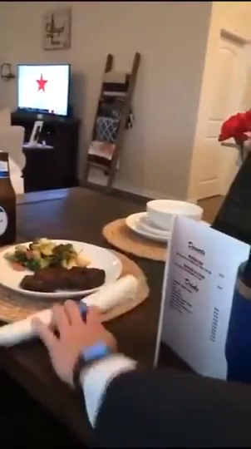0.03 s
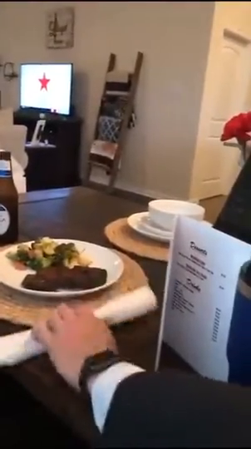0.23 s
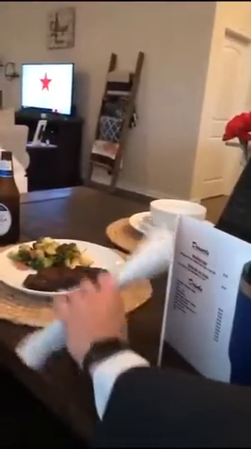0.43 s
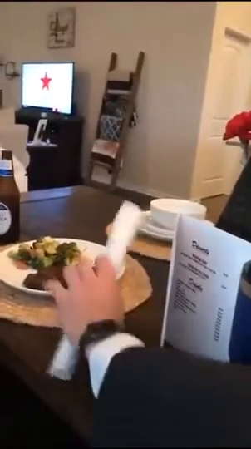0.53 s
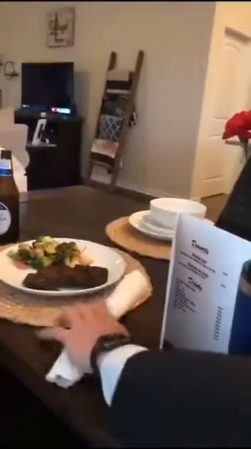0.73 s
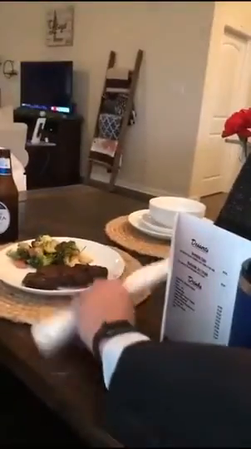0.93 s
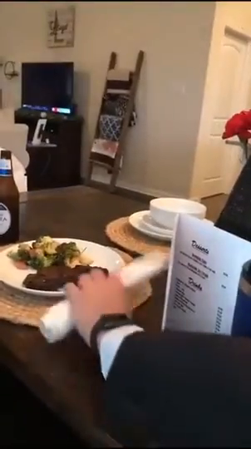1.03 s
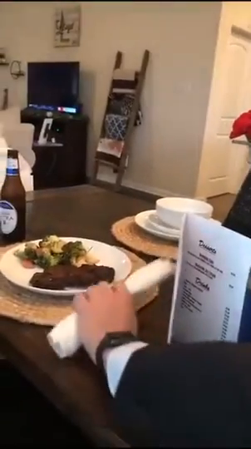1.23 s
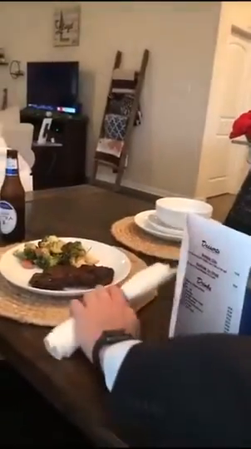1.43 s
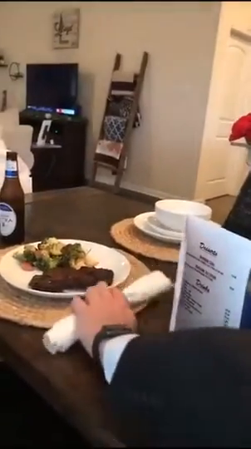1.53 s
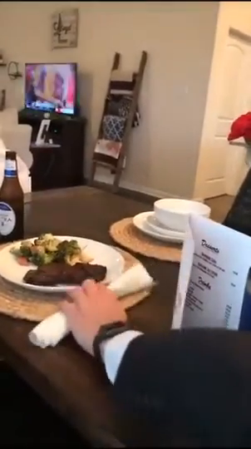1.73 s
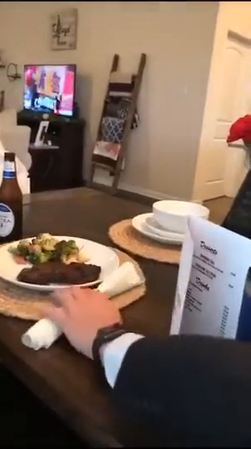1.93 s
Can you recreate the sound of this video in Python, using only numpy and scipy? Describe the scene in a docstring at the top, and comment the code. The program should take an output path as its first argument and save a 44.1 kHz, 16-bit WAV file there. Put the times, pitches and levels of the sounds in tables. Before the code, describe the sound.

Close up in a quiet dining room, a napkin roll of steel cutlery clinks in a quick cluster, knocks down on a wooden table, then ticks sparsely while cloth rubs softly over a woven mat.

```python
"""Cutlery rolled in a cloth napkin: knife and fork clink, ring until the cloth damps them, then tick in the hand.
Lifted and set down on a wooden dining table, heard close up; both channels are equal.
Steel, wood and crockery are sums of decaying sines; contacts are decaying random impulses, filtered.
The napkin rubs over the place mat as filtered grainy noise; a decaying-noise room answers over a quiet floor."""
import sys
import numpy as np
from scipy import signal
from scipy.fft import rfft, irfft
from scipy.io import wavfile
from scipy.ndimage import uniform_filter1d

SR = 44100
rng = np.random.default_rng(int(sys.argv[2]) if len(sys.argv) > 2 else 0)


def transcribe(signal):
    """Save signal, clipped to [-1, 1], as a 16-bit WAV file at the path in sys.argv[1]."""
    frames = np.atleast_2d(signal).T
    limited = np.clip(frames, -1, 1)
    pcm = np.round(limited * 32767).astype(np.int16)
    wavfile.write(sys.argv[1], SR, pcm)


N = 88200
T = np.arange(SR * 3 // 4) / SR  # time axis of one struck sound, s

# loose cutlery, metal on metal: start_s, click_db, tilt_db_per_octave, click_t60_s, ring_db, free_ring_s,
# handle_hz, handle_db
CLINK_EVENTS = [(.1952, -24, -4.5, 0.028, -49, 0.0018, 1800, -31),
                (.2078, -17.5, 1.5, 0.017, -12.5, 0.0029, 7300, -36),
                (0.2131, -18, -2.5, 0.019, -13.5, 0.0046, 3810, -33),
                (0.2279, -43, 7, .03, -12.5, 0.015, 3980, -37),
                (0.224, -23, -3, 0.025, -22, .004, 4670, -37),
                (0.2493, -15, 2.5, 0.015, -14.5, 0.014, 5650, -29),
                (0.254, -20, -2, 0.022, -16.5, 0.013, 3860, -31),
                (.258, -37, 6, 0.038, -32, .006, 2150, -35),
                (.371, -34.5, -3, 0.083, -48, 0.0072, 3086, -40.5),
                (0.382, -36, -2.5, 0.074, -28.5, 0.0068, 8400, -52),
                (.402, -37.5, 0.5, 0.12, -60.5, 0.0043, 8080, -42.5),
                (0.5249, -25.5, -1.5, 0.015, -37.5, .012, 5030, -48),
                (.535, -39.5, -7.5, 0.091, -38, 0.0054, 9500, -39),
                (0.5469, -31, -1.5, 0.075, -35, .014, 2980, -37.5),
                (0.5621, -29.5, -2, 0.094, -36, 0.0084, 2483, -35),
                (0.8308, -20.5, -4.5, 0.006, -48, 0.0016, 4340, -42),
                (0.8428, -35, -2, 0.096, -48, .008, 5500, -38),
                (0.8627, -28, -3, 0.023, -57, .003, 5700, -52),
                (0.8879, -8.5, -1.5, 0.0089, -23, 0.0018, 4570, -25),
                (0.8928, -11.5, 0.5, 0.0061, -48, .003, 2100, -32.5),
                (.9, -16.5, -0.5, 0.032, -23, 0.0036, 12200, -28),
                (.9035, -12, 12, 0.03, -32, 0.0058, 3690, -37),
                (.908, -26.5, -6.5, 0.02, -33, 0.011, 2073, -40)]
# cutlery pinched under the hand: start_s, click_db, tilt_db_per_octave, click_t60_s, ring_db, pinch_db,
# pitch1_hz, pitch2_hz, pitch3_hz
TICK_EVENTS = [(.099, -40, -1, 0.034, -67, -63, 2460, 4300, 5500),
               (1.073, -31, 3, 0.013, -46, -54, 4700, 7100, 13100),
               (1.1877, -13.5, -2, 0.0064, -31, -26.5, 3424, 5170, 12400),
               (1.195, -34, -2, 0.061, -34, -30, 4110, 5420, 13100),
               (1.238, -57, 6, 0.037, -43, -43, 3940, 5200, 10100),
               (1.3426, -16.5, 2.5, 0.018, -48, -28, 4180, 4560, 11240),
               (1.349, -29, -0.5, 0.033, -57, -30, 3900, 4400, 7400),
               (1.399, -41, -3, 0.036, -67, -46, 3970, 4480, 5320),
               (1.7511, -17.5, 5.5, 0.012, -39, -31.5, 4640, 5800, 13150),
               (1.758, -25, 6, 0.017, -53, -33, 4790, 5760, 13350),
               (1.87, -42, 5, .02, -53, -54, 4900, 7300, 13300),
               (1.95, -30.5, 1.5, 0.01, -44, -33.5, 4570, 7430, 13700),
               (1.953, -29, 4, 0.011, -49, -35, 5870, 7180, 13500)]
# two tines escape the grip and ring on, beating: start_s, level_db, t60_s, pitch1_hz, pitch2_hz
LINGERING_TINES = (1.1877, -42, .4, 12062, 12100)
# steel modes before damping: mode_hz, level_db, t60_s
STEEL_MODES = [(3900, -21, .2), (5440, -27, .2), (7303, -9.5, .45), (8000, -31, .17), (10150, -22, .3),
               (10253, -14, .4), (12026, -8, .25), (12062, 0, .3), (12099, -1, .3), (12240, -7, .13),
               (12380, -6, .1), (12630, -10, .19), (13040, -13, .25), (13652, -13, .5), (15420, -14, .4)]
# crack spectrum, loose steel: freq_hz, relative_db_per_hz
CLINK_SPECTRUM = [(100, -26), (900, -16), (1600, -10.5), (2300, -3), (3200, -3.5), (4400, 1), (6500, -0.5),
                  (8700, -2), (9800, -1), (10800, -4.5), (12300, 6.5), (14000, 3.5), (15600, -2.5)]
# crack spectrum, pinched steel: freq_hz, relative_db_per_hz
TICK_SPECTRUM = [(100, -32), (900, -28), (1700, -14), (2300, -1), (3300, 0), (4200, -1), (5400, 2),
                 (6300, -4), (7400, -4), (8600, -8), (10200, 0), (10900, -4), (11800, 6), (13200, 7),
                 (14200, -2), (15600, -2)]
# click reflections off plate, table and menu card: delay_s, level_db
CLICK_ECHOES = [(.0031, -6.5), (.0058, -27), (.0087, -10.5), (0.0153, -13.5)]
HANDLE_T60_S, PINCH_T60_S = 0.07, 0.04
CLOTH_DAMP_T60_S, HAND_DAMP_T60_S = 0.071, 0.16  # on top of each mode's own decay
STEEL_RISE_S = 0.0012
STRIKE_SPREAD_DB = 1  # +/- per mode, varies with the spot struck

# handles and hand on the table: start_s, knock_db, tilt_db_per_octave, boom_db
KNOCK_EVENTS = [(0.1957, -16.5, 3.5, -34), (0.2077, -27, -2, -50), (.217, -32, -2, -32),
                (0.245, -46, -8, -45), (0.284, -35, -5.5, -50), (.3525, -22.5, 3.5, -45.5),
                (0.3632, -32.5, 2, -42), (0.371, -42, 2, -40), (.57, -46, 1, -43.5),
                (0.8307, -15, 0.5, -36), (0.8417, -27, -2, -36), (.850, -24, -3.5, -37.5),
                (.888, -25.5, 3, -26.5), (.903, -28, -5.5, -28), (0.934, -39, -1, -34),
                (0.953, -46, -10, -36), (1.003, -41, -3.5, -44.5), (1.612, -65, -3, -51)]
# wood modes: mode_hz, level_db, t60_s
WOOD_MODES = [(236.6, -9, .18), (382, -8, .11), (440, -.5, .038), (502, -3.5, .045), (610, -7, .09),
              (848, -11, .075), (922, -4.5, .045), (952, -1.5, .04), (1235, -11, .055), (1900, -10, .016)]
# modes of the whole table top: mode_hz, level_db, t60_s
BOOM_MODES = [(61.3, -19, 0.25), (77.4, -4.5, 0.3), (105.2, -3, 0.39), (174.8, 2, 0.27), (249, 0, 0.33),
              (348, -12.5, 0.27)]
# knock rattle spectrum: freq_hz, relative_db_per_hz
RATTLE_SPECTRUM = [(40, -29), (120, -7), (230, -1.5), (340, -4), (480, 5), (720, -3), (960, -19.5),
                   (1100, -6.5), (1400, -17), (1900, -18), (2600, -24), (4000, -40.5), (9000, -47),
                   (16000, -75)]
# spectrum of the dull push into the table: freq_hz, relative_db_per_hz
THUMP_SPECTRUM = [(25, -33.5), (60, -2.5), (110, 1.5), (170, 0.5), (260, 4), (380, -6.5), (700, -27.5),
                  (2000, -68), (16000, -80)]
RATTLE_T60_S, RATTLE_RISE_S, RATTLE_DB = 0.07, 0.002, -4
THUMP_T60_S, BOOM_RISE_S, BOOM_DB = 0.13, 0.0029, -1
WOOD_RISE_CYCLES = 1.2

# light touch on crockery: start_s, level_db
CROCKERY_TOUCH = (1.8438, -37.5)
# crockery modes: mode_hz, level_db, t60_s
CROCKERY_MODES = [(2277, 0, .1), (3187, -3, .12), (4204, -13, .1)]

# cloth and cutlery sliding: start_s, length_s, level_db, tilt_db_per_octave
RUB_EVENTS = [(0.464, 0.079, -48.5, 1), (.55, .14, -51.5, 0), (0.676, 0.13, -56, -2),
              (0.775, 0.074, -44, 0), (0.913, 0.098, -48.5, -6), (1.062, 0.054, -47, -1.5),
              (1.222, 0.044, -47.5, 5), (1.357, 0.033, -49.5, 0), (1.578, 0.031, -56, -1),
              (1.731, 0.23, -48.5, -6), (1.924, 0.092, -48.5, -3.5)]
# cloth friction spectrum: freq_hz, relative_db_per_hz
CLOTH_SPECTRUM = [(100, -3.5), (600, -20), (1300, 1), (2200, 4), (3500, 0), (5500, 2.5), (9000, -5),
                  (12500, 2.5), (16000, -30)]

# room decay: freq_hz, t60_s
ROOM_DECAY = [(60, 0.15), (250, 0.62), (1000, 0.5), (4000, 0.68), (8000, 0.62), (15000, 0.32)]
WET_WOOD_DB, WET_STEEL_DB = -5, -16.5  # sends to the room
ROOM_RAMP_S = 0.009

# background spectrum: freq_hz, relative_db_per_hz
FLOOR_SPECTRUM = [(12, -22), (20, -0.5), (53, 2), (107, -11.5), (187, -11.5), (337, -14.5), (590, -18.5),
                  (780, -25.5), (1060, -22.5), (2320, -22), (3250, -29.5), (4060, -25.5), (6010, -33),
                  (14300, -27.5), (16000, -48)]
FLOOR_DB = -48.5
EDGE_HZ = 15900


def amp(db):
    """Decibels to gain."""
    return 10 ** (np.asarray(db) / 20)


def unit(x):
    """Scales to rms 1."""
    return x / np.sqrt(np.mean(x ** 2) + 1e-20)


def read(points, hz):
    """Interpolates a table on a log-frequency axis."""
    f, value = np.transpose(points)
    return np.interp(np.log(hz + 1), np.log(f + 1), value)


def fade(t, t60_s):
    """Exponential decay, 60 dB per t60_s."""
    return np.exp(-np.log(1000) * t / np.maximum(t60_s, 1e-3))


def add(mix, start_s, sound):
    """Mixes a sound in at start_s, cut at the end of the mix."""
    part = mix[max(round(start_s * SR), 0):][:len(sound)]
    part += sound[:len(part)]


def colour(x, points, tilt_db=0, pivot_hz=1000, size=2048):
    """Minimum-phase filter of unit power with the given spectrum and tilt."""
    hz = np.fft.rfftfreq(size, 1 / SR)
    octaves = np.log2(np.maximum(hz / pivot_hz, 1 / 8))
    gain = unit(amp(read(points, hz) + tilt_db * octaves))
    # folding the cepstrum makes the filter causal
    cepstrum = irfft(np.log(gain + 1e-5))
    cepstrum[1:size // 2] *= 2
    cepstrum[size // 2 + 1:] = 0
    response = irfft(np.exp(rfft(cepstrum)))
    return signal.fftconvolve(x, response)[:len(x)]


def ring(modes, rise_cycles=0, spread_db=0):
    """Decaying modes struck together, near rms 1 before decay; each builds over rise_cycles."""
    hz, db, t60_s = np.transpose(modes)[:, :, None]
    gain = amp(db + spread_db * rng.uniform(-1, 1, db.shape))
    build = 1 - np.exp(-hz * T / (rise_cycles + 1e-6))
    waves = gain * build * fade(T, t60_s) * np.sin(2 * np.pi * hz * T)
    return waves.sum(0) / np.sqrt(np.sum(gain ** 2) / 2)


def chatter(t60_s):
    """A contact: dense tiny impacts of random sign, decaying."""
    return rng.choice([-1., 1.], len(T)) * fade(T, t60_s)


def click(spectrum, tilt_db, t60_s):
    """Crack of one steel contact with its echoes off nearby things."""
    direct = colour(chatter(t60_s), spectrum, tilt_db, pivot_hz=7000)
    out = direct.copy()
    for delay_s, db in CLICK_ECHOES:
        add(out, delay_s, amp(db) * direct)
    return out


def clinks():
    """Loose steel: click, handle note, and modes that ring free until the cloth closes on them."""
    out = np.zeros(N)
    rise = np.minimum(T / STEEL_RISE_S, 1)
    for start_s, click_db, tilt_db, t60_s, ring_db, free_s, handle_hz, handle_db in CLINK_EVENTS:
        crack = amp(click_db) * click(CLINK_SPECTRUM, tilt_db, t60_s)
        damping = fade(np.maximum(T - free_s, 0), CLOTH_DAMP_T60_S)
        steel = amp(ring_db) * ring(STEEL_MODES, spread_db=STRIKE_SPREAD_DB) * damping
        handle = amp(handle_db) * ring([(handle_hz, 0, HANDLE_T60_S)])
        add(out, start_s, crack + rise * (steel + handle))
    return out


def ticks():
    """Pinched steel: click, hand-damped modes and short resonances at pitches set by the grip."""
    out = np.zeros(N)
    for start_s, click_db, tilt_db, t60_s, ring_db, pinch_db, *pitches_hz in TICK_EVENTS:
        crack = amp(click_db) * click(TICK_SPECTRUM, tilt_db, t60_s)
        steel = amp(ring_db) * ring(STEEL_MODES, spread_db=STRIKE_SPREAD_DB) * fade(T, HAND_DAMP_T60_S)
        pinched = amp(pinch_db) * ring([(hz, 0, PINCH_T60_S) for hz in pitches_hz])
        add(out, start_s, crack + steel + pinched)
    return out


def tines():
    """Two free tines close in pitch beat as they decay."""
    out = np.zeros(N)
    start_s, db, t60_s, *pitches_hz = LINGERING_TINES
    add(out, start_s, amp(db) * ring([(hz, 0, t60_s) for hz in pitches_hz]))
    return out


def table():
    """A knock rings the wood over a brief rattle, plus a low thump with the boom of the whole top."""
    out = np.zeros(N)
    rattle_rise = np.minimum(T / RATTLE_RISE_S, 1)
    boom_rise = np.minimum(T / BOOM_RISE_S, 1)
    for start_s, knock_db, tilt_db, boom_db in KNOCK_EVENTS:
        rattle = colour(chatter(RATTLE_T60_S), RATTLE_SPECTRUM, tilt_db, pivot_hz=600) * rattle_rise
        knock = amp(RATTLE_DB) * rattle + ring(WOOD_MODES, WOOD_RISE_CYCLES, STRIKE_SPREAD_DB)
        push = colour(chatter(THUMP_T60_S), THUMP_SPECTRUM)
        thump = push + amp(BOOM_DB) * ring(BOOM_MODES)
        add(out, start_s, amp(knock_db) * knock)
        add(out, start_s, amp(boom_db) * thump * boom_rise)
    return out


def crockery():
    """A light touch rings a few decaying modes."""
    out = np.zeros(N)
    start_s, db = CROCKERY_TOUCH
    add(out, start_s, amp(db) * ring(CROCKERY_MODES))
    return out


def napkin(grain_db=3):
    """Grainy friction noise swells and fades under each slide."""
    out = np.zeros(N)
    for start_s, length_s, db, tilt_db in RUB_EVENTS:
        hiss, grains = rng.standard_normal((2, len(T)))
        grain_gain = amp(grain_db * unit(uniform_filter1d(grains, size=130)))
        grit = unit(colour(hiss * grain_gain, CLOTH_SPECTRUM, tilt_db, pivot_hz=3000))
        swell = np.sqrt(np.hanning(int(length_s * SR)))
        add(out, start_s, amp(db) * swell * grit[:len(swell)])
    return out


def room(x):
    """Diffuse tail of the dining room: noise decaying at a rate set per frequency."""
    hz, t, z = signal.stft(rng.standard_normal(len(T)), SR, nperseg=256)
    decayed = z * fade(t, read(ROOM_DECAY, hz)[:, None])
    tail = signal.istft(decayed, SR, nperseg=256)[1][:len(T)]
    tail *= np.clip(T / ROOM_RAMP_S - .5, 0, 1)  # ramp starts half its length late
    return signal.fftconvolve(x, tail / np.linalg.norm(tail))[:N]


def background(waver_db=1):
    """Low rumble and faint hiss of the room, slowly wavering in level."""
    hz = np.fft.rfftfreq(N, 1 / SR)
    noise = unit(irfft(rfft(rng.standard_normal(N)) * amp(read(FLOOR_SPECTRUM, hz)), N))
    waver = unit(uniform_filter1d(rng.standard_normal(N), size=3000))
    return amp(FLOOR_DB + waver_db * waver) * noise


def scene():
    """All sources and the room, the same in both channels."""
    steel = clinks() + ticks() + tines() + crockery() + napkin()
    wood = table()
    reverb = room(amp(WET_WOOD_DB) * wood + amp(WET_STEEL_DB) * steel)
    mix = wood + steel + reverb + background()
    return np.array([mix, mix])


def record(dry):
    """The recorder's band limit: linear-phase low-pass at EDGE_HZ."""
    lowpass = signal.firwin(255, EDGE_HZ, window=("kaiser", 9), fs=SR)
    return signal.oaconvolve(dry, lowpass[None], "same")


dry = scene()
out = record(dry)
transcribe(out)
```